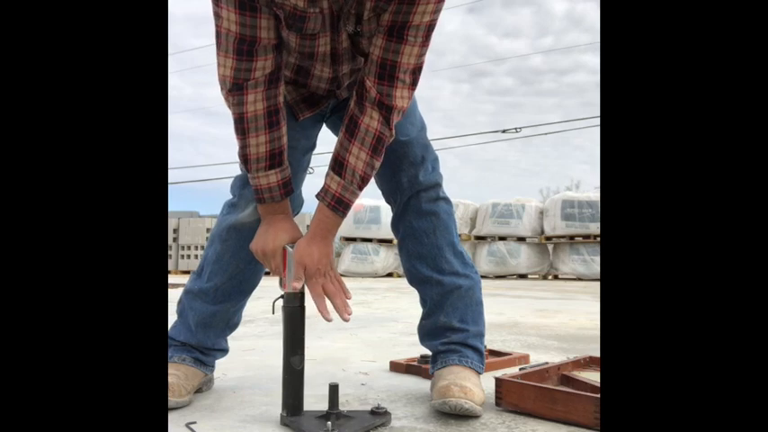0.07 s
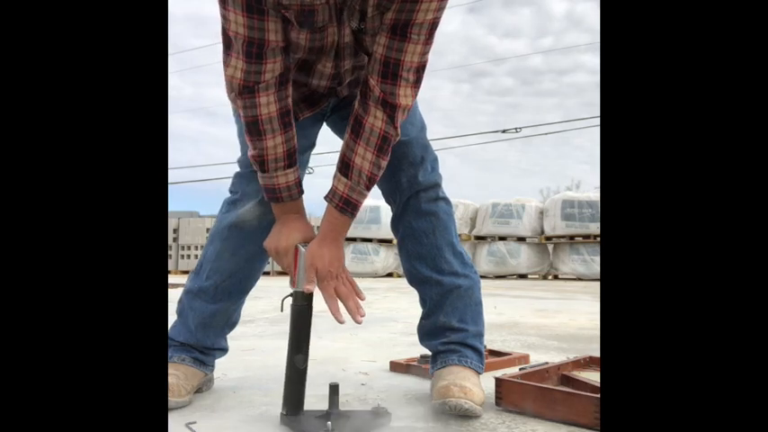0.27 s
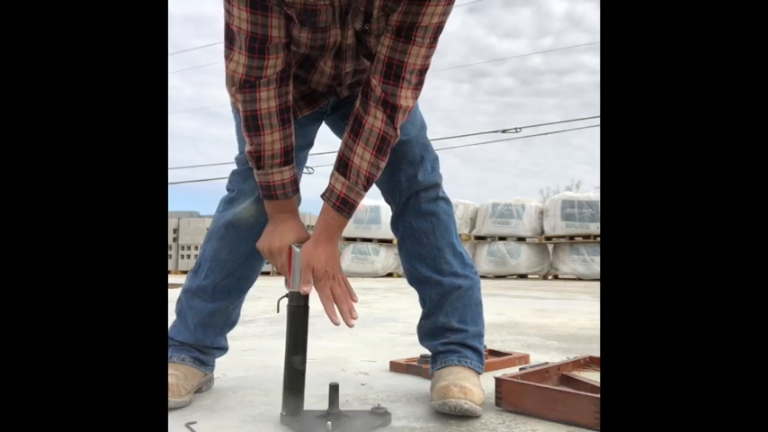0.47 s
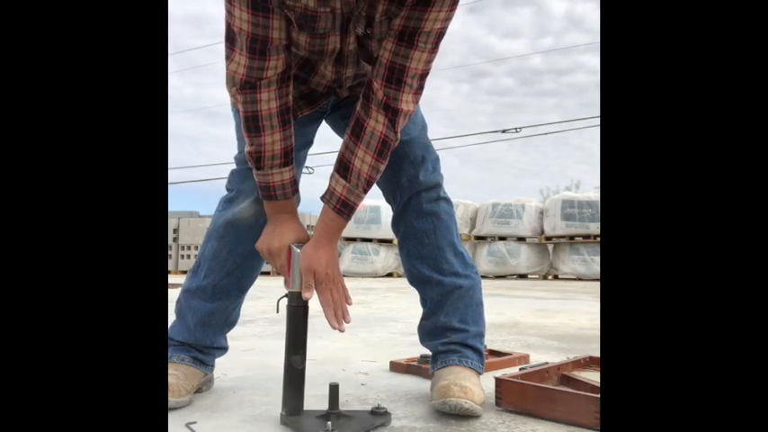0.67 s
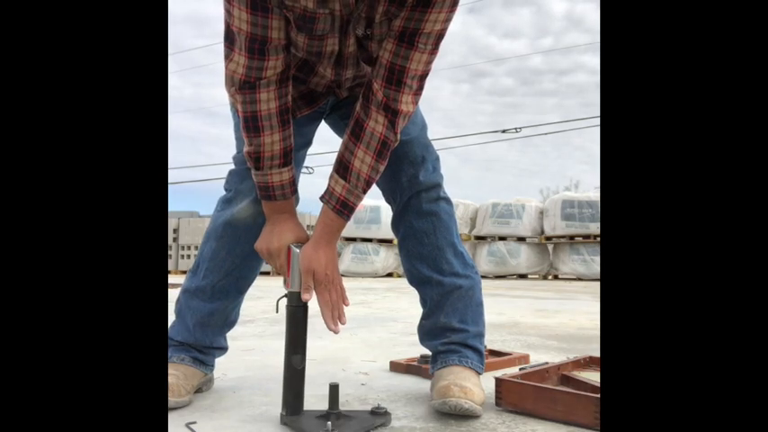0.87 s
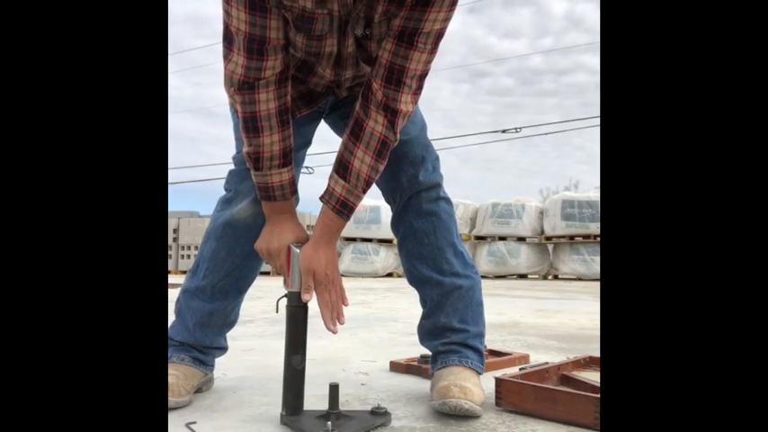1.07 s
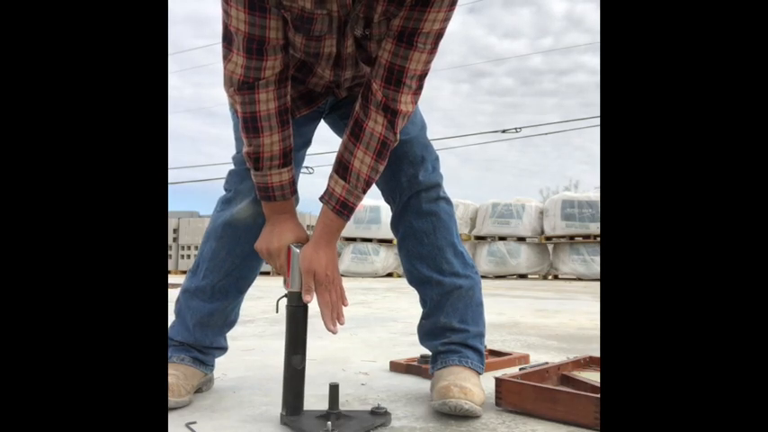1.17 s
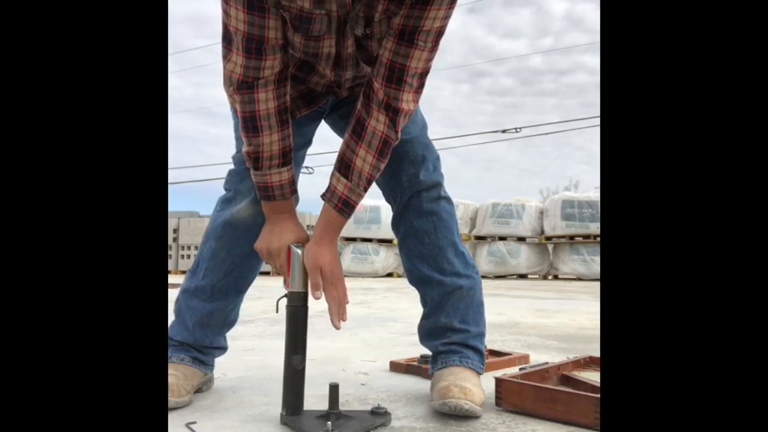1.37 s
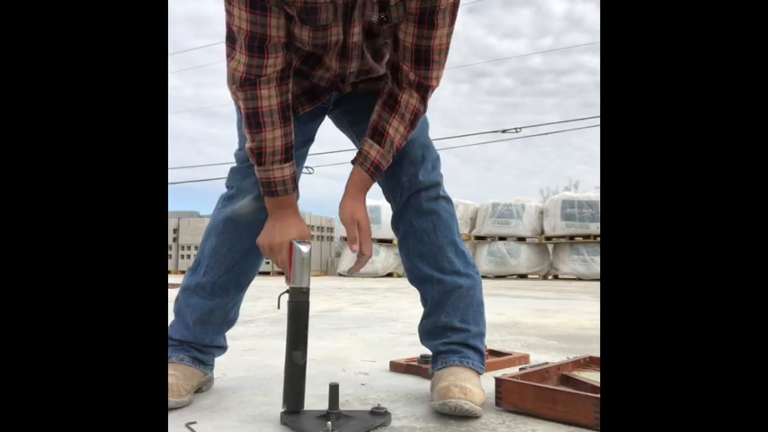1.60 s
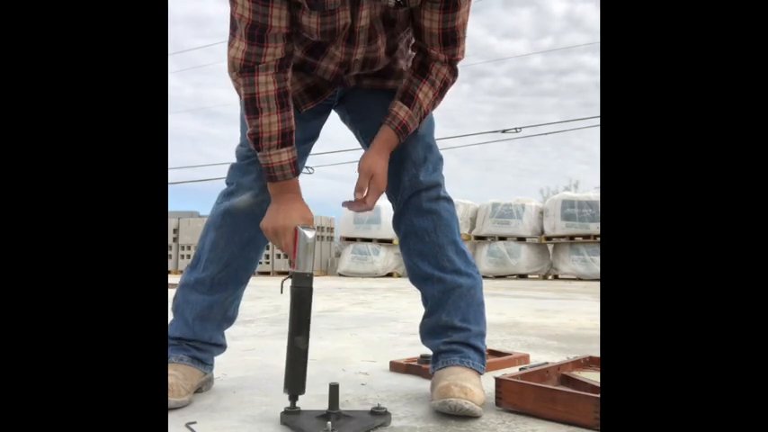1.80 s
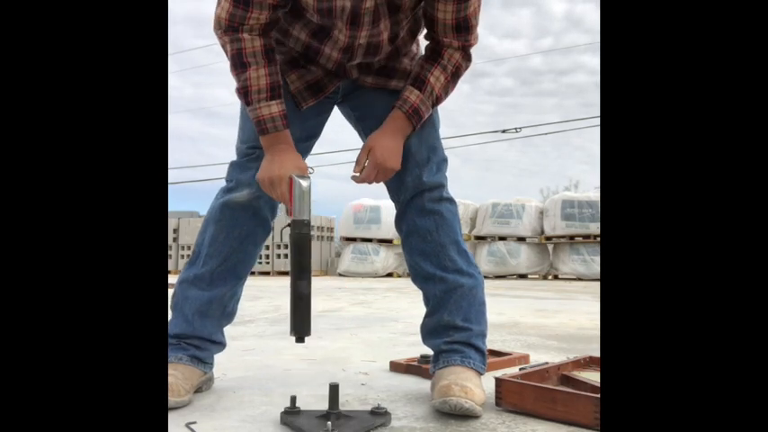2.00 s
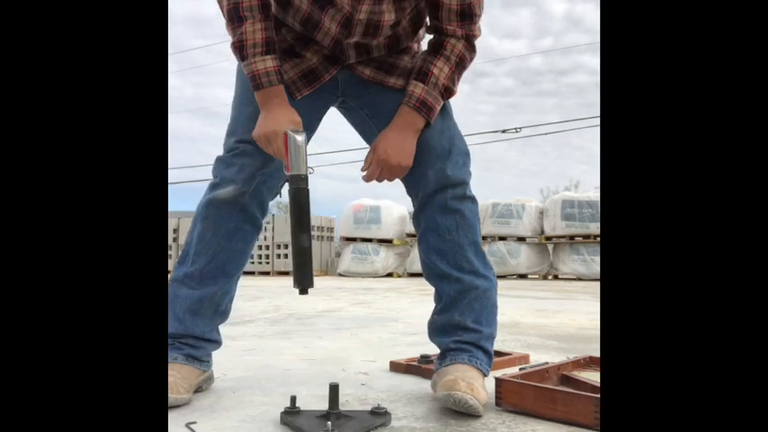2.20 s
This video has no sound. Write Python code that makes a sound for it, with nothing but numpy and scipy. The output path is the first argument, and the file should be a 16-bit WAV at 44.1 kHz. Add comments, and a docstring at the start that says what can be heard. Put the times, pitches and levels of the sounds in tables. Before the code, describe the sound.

A loud sharp bang comes at about 0.25 seconds as a powder-fired tool shoots into concrete. It knocks on its metal plate right after, with a brief steel ring and a short outdoor echo. A small tick follows at 0.5 seconds, then very faint scraping. Near 1.9 seconds the barrel gives a crisp metal clack and slight rattle. Faint wind and a distant engine hum lie underneath.

```python
"""Powder-driven probe in concrete

A powder-actuated driver is fired into a slab in an open yard. The burning charge excites the barrel's
modes and ends in a crack and a thump; steel rings, gas vents, the tool bounces on its base plate and the
yard reverberates. The muzzle rubs faintly by stick-slip friction, sleeves rustle, and the barrel clacks
against its stop as the tool is lifted. A far engine hums and air buffets the microphone."""
import sys
import numpy as np
from scipy import signal
from scipy.fft import rfft, irfft
from scipy.io import wavfile

SR = 44100
rng = np.random.default_rng(int(sys.argv[2]) if len(sys.argv) > 2 else 0)


def digitize_waveform(pressure):
    """Quantize a signal to 16-bit integers and store it at the path in sys.argv[1].

    Rows of a 2-D input are taken as channels; values are limited to [-1, 1].
    """
    field = np.atleast_2d(pressure).T
    bounded = np.clip(field, -1, 1)
    quanta = np.round(bounded * 32767).astype(np.int16)
    wavfile.write(sys.argv[1], SR, quanta)


N = 99225
T = np.arange(N) / SR

# background level, low just after the shot: (time [s], level [dB])
BACKGROUND_LEVELS = [(0, -48), (.25, -46.5), (.42, -61), (.65, -57), (1.0, -53.5), (1.35, -53),
                     (1.7, -49.5), (2.25, -49.5)]
# tones of the far engine: (frequency [Hz], level relative to the background [dB])
ENGINE_TONES = [(113, -2.5), (1895, -18)]
# swells of moving air and of cloth: (time [s], level [dB], rise [s], T60 [s])
AIR_GUSTS = [(.01, -49.5, 0.12, 0.61), (.17, -44.5, 0.48, 0.33), (.9, -53, 0.16, 0.37),
             (1.48, -38, 0.36, 0.67), (2.039, -45, 0.26, 0.29), (2.139, -37.5, 0.27, 0.11)]
SLEEVE_RUSTLES = [(1.539, -66.5, 0.81, 1.22), (1.691, -71.5, 0.39, 0.39), (2.12, -70.5, 1.5, 1.0)]
# the trigger's click, then knocks of the tool on its plate:
# (time [s], main tone [Hz], ring level [dB], noise level [dB], noise T60 [s])
CLICK_AND_KNOCKS = [(0.2299, 1200, -38, -29.5, 0.035), (0.3061, 985, -19.5, -25, 0.073),
                    (.32, 1267, -12, -13.5, 0.018), (0.324, 1127, -15, -29, 0.026),
                    (0.3553, 1230, -26, -49, 0.068), (0.712, 974, -44, -68, 0.03),
                    (1.821, 1150, -31, -50.5, 0.028), (1.847, 1020, -37.5, -55, 0.039)]
# ticks of the mechanism: (time [s], level [dB], gain of added treble [dB])
MECHANISM_TICKS = [(0.4518, -64, -2), (0.5062, -29, -21), (1.758, -56.5, 7)]
# strokes of the muzzle on the plate: (time [s], duration [s], level [dB])
RUB_STROKES = [(0.61, 0.037, -67.5), (0.684, 0.038, -75), (0.819, 0.023, -71.5), (0.876, 0.018, -72),
               (0.984, 0.02, -66), (1.052, 0.075, -64.5)]
# scuffs on concrete: (time [s], level [dB], T60 [s])
MUZZLE_SCUFFS = [(.645, -59.5, .04), (.657, -52.5, 0.033), (1.717, -50, 0.062)]
# bounces of a small steel part: (time [s], level [dB])
PART_BOUNCES = [(1.8885, -38), (1.899, -47)]

# barrel modes driven by the charge: (frequency [Hz], relative level [dB])
BARREL_MODES = [(243, -24), (330, -29), (467, -28.5), (546, -28), (1095, -21), (1580, -26), (1730, -23),
                (1965, -18), (2285, -26), (2480, -29), (4372, -26), (6800, -35)]
# freely decaying modes: (frequency [Hz], relative level [dB], T60 [s])
CONTACT_UPPER_MODES = [(1754, -12, .022), (2392, -17.5, 0.035), (2860, -15, 0.021), (3676, -25, .13),
                       (5200, -16, 0.016)]
STEEL_MODES = [(840, -34, .25), (3660, -25, .08), (7890, -28, .33), (10750, -47, .15), (11710, -46, .14),
               (13690, -38, .075)]
LATCH_MODES = [(680, 1, .035), (1050, 0, .07), (1250, 6, .05), (2960, 8, .02), (3655, -5, .2),
               (4030, 14, .015), (4560, -5, .05), (5310, 13, .012)]
PART_MODES = [(9000, -7, 0.051), (11080, -2.5, 0.034), (13660, -2, 0.059)]
# resonances driven by rubbing: (frequency [Hz], bandwidth [Hz], relative level [dB])
RUB_RESONANCES = [(2948, 37, -3.5), (3290, 90, -4.5), (4250, 32, -5.5), (5435, 80, 2.5), (6460, 140, -6.5),
                  (7600, 260, 0), (8420, 220, -5.5), (10620, 670, -9.5), (13600, 900, -21)]

# spectra of the noise sources: (frequency [Hz], relative level [dB])
BACKGROUND_SPECTRUM = [(15, -42.5), (25, -17), (108, -2), (384, -11), (800, -11.5), (1790, -23),
                       (2110, -29), (7710, -47), (15500, -55.5)]
GUST_SPECTRUM = [(25, -9.5), (58, -2), (105, 0.5), (250, -9), (500, -20), (1200, -42), (4000, -83)]
GAS_SPECTRUM = [(40, -6), (110, -6), (350, -8.5), (700, -4.5), (1100, -1.5), (1900, 0.5),
                (3400, -22.5), (4400, -15), (6900, -28), (16000, -53.5)]
CONTACT_SPECTRUM = [(450, -18.5), (750, -9.5), (1200, -3.5), (1700, -7), (2700, -15.5), (4500, -12),
                    (7660, -14), (8400, -21.5), (11500, -19.5), (16000, -32.5)]
CRACK_SPECTRUM = [(250, -6), (450, -7), (800, -5.5), (1100, -8.5), (2000, -1), (2800, -13.5), (4200, -5.5),
                  (6300, -7.5), (8500, -16), (12500, -17.5), (15500, -19.5)]
VENT_SPECTRUM = [(220, -11.5), (900, -3), (1500, -10.5), (3300, -15), (7400, -18), (16000, -24.5)]
YARD_SPECTRUM = [(100, -2.5), (340, -13.5), (560, -2.5), (1000, -1.5), (1450, -9.5), (2600, -12),
                 (7000, -22), (9000, -32.5), (15500, -42)]
THUD_SPECTRUM = [(110, -7), (190, 0.5), (300, -7), (520, -4.5), (820, -3), (1200, -22), (4000, -58)]
TICK_SPECTRUM = [(1750, -24), (2250, 6.5), (3900, -1), (4700, -7), (6600, 4.5), (8900, -6), (15500, -5.5)]
SCUFF_SPECTRUM = [(650, -1), (1400, -4), (3400, -13), (5600, -14), (12000, -32.5)]
CLOTH_SPECTRUM = [(1500, 1.5), (3000, -9), (3750, -4), (4100, 7), (4500, -1), (6000, -3), (9000, -16.5),
                  (15500, -33)]
SLIDE_SPECTRUM = [(600, -2), (1050, 10), (1600, -25), (2600, 4), (3200, -5), (5200, -13), (12000, -40)]
CLACK_SPECTRUM = [(380, -44), (680, -5), (1200, -14.5), (2200, -8), (2950, -10.5), (3400, -12.5),
                  (4030, -2), (4600, -3.5), (5310, 2.5), (7000, -15.5), (7700, -8.5), (9000, -19),
                  (14000, -25.5)]
RATTLE_SPECTRUM = [(1100, -1), (1800, -7), (4500, -5), (7000, -9), (8700, -5), (13600, -20), (15000, -30)]

TRIGGER_S, BURN_PEAK_S, CRACK_S, RECOIL_S, CLACK_S = .2266, .2505, .2527, .256, 1.8721


def from_db(db):
    """Amplitude ratio of a level in decibels."""
    return 10 ** (np.asarray(db) / 20)


def rms_one(x):
    """Normalisation to unit mean power."""
    return x / np.sqrt(np.mean(x ** 2) + 1e-20)


def noise(spectrum):
    """Spectral shaping of white noise to unit power, with a roll-off below the first point."""
    hz, db = np.transpose(spectrum)
    bins_hz = np.maximum(np.fft.rfftfreq(N, 1 / SR), 1)
    gain = from_db(np.interp(np.log(bins_hz), np.log(hz), db))
    roll_off = np.minimum(bins_hz / hz[0], 1) ** 2
    return rms_one(irfft(rfft(rng.standard_normal(N)) * gain * roll_off, N))


def drift(rate):
    """Random modulation: linear interpolation through `rate` Gaussian values a second."""
    knots = rng.standard_normal(1000)
    return np.interp(T * rate, np.arange(len(knots)), knots)


def burst(at, rise, t60, hold=0):
    """Exponential growth and decay: up 60 dB in `rise` s until `at`, held, then down 60 dB in `t60` s."""
    before = np.maximum(at - T, 0) / rise
    after = np.maximum(T - at - hold, 0) / t60
    return from_db(-60 * np.minimum(before + after, 10))


def sine(hz):
    """Simple harmonic motion with a random phase."""
    return np.sin(2 * np.pi * (hz * T + rng.random()))


def struck(at, modes):
    """Impulse response from time `at`: a sum of damped modes of alternating sign."""
    age = np.maximum(T[:SR] - at % (1 / SR), 0)
    ring = sum((-1) ** k * from_db(db - 60 * np.minimum(age / t60, 10)) * np.sin(2 * np.pi * hz * age)
               for k, (hz, db, t60) in enumerate(modes))
    return np.concatenate([np.zeros(int(at * SR)), ring, np.zeros(N)])[:N]


def background():
    """Broadband yard noise and a far engine's wavering tones superpose under one envelope."""
    hum = sum(from_db(db + drift(14)) * sine(hz) for hz, db in ENGINE_TONES)
    level_db = np.interp(T, *np.transpose(BACKGROUND_LEVELS))
    return from_db(level_db) * (noise(BACKGROUND_SPECTRUM) + hum)


def gusts():
    """Turbulent air at the microphone produces low-frequency pressure fluctuations."""
    envelope = sum(from_db(db) * burst(at, rise, t60) for at, db, rise, t60 in AIR_GUSTS)
    return envelope * noise(GUST_SPECTRUM)


def burning_charge():
    """Forced vibration: rushing gas swells with the barrel's modes, of which the low ones last longer."""
    swell = burst(BURN_PEAK_S, rise=.035, t60=.027)
    low_swell = from_db(-3) * burst(BURN_PEAK_S, rise=.042, t60=.027, hold=.009)
    modes = sum(from_db(db) * sine(hz) * (low_swell if hz < 700 else swell) for hz, db in BARREL_MODES)
    steady_rms = np.sqrt(sum(from_db(db) ** 2 for _, db in BARREL_MODES) / 2)
    barrel = from_db(-5) * modes / steady_rms
    gas = from_db(-10.5) * noise(GAS_SPECTRUM) * swell
    onset = burst(TRIGGER_S, rise=.008, t60=1, hold=1)
    return (barrel + gas) * onset


def click_and_knocks():
    """Impulsive excitation of modes: the trigger clicks, then the tool knocks on its plate."""
    crunch = noise(CONTACT_SPECTRUM)
    contacts = np.zeros(N)
    for at, hz, ring_db, noise_db, noise_t60 in CLICK_AND_KNOCKS:
        main_mode, lower_mode = (hz, 0, .037), (.8 * hz, -7.5, .04)
        contacts += from_db(ring_db) * struck(at, [main_mode, lower_mode] + CONTACT_UPPER_MODES)
        contacts += from_db(noise_db) * crunch * burst(at, rise=.0023, t60=noise_t60)
    return contacts


def steel_ring():
    """Free vibration: after the shot each steel mode wavers in level and decays at its own rate."""
    gain_db, waver_db = -1, 2
    ring = sum(from_db(db + waver_db * drift(100)) * sine(hz) * burst(.288, rise=.22, t60=t60)
               for hz, db, t60 in STEEL_MODES)
    onset = burst(.241, rise=.013, t60=1, hold=1)
    return from_db(gain_db) * ring * onset


def probe_crack():
    """The probe's impact on the concrete is brief, so its spectrum is broad."""
    return from_db(-4.5) * noise(CRACK_SPECTRUM) * burst(CRACK_S, rise=.0011, t60=.017, hold=.003)


def venting_gas():
    """Jet noise: gas hisses out as the tool recoils."""
    return from_db(-28.5) * noise(VENT_SPECTRUM) * burst(.2912, rise=.084, t60=.21) * (T > CRACK_S)


def yard_reverberation():
    """The shot's diffuse reflections merge into exponentially decaying noise."""
    return from_db(-38.5) * noise(YARD_SPECTRUM) * burst(.33, rise=.11, t60=.57) * (T > CRACK_S)


def recoil_thump():
    """Recoil radiates a low pressure swing whose frequency falls exponentially."""
    start_hz, end_hz, sag_s = 403, 55, .0045
    age = np.maximum(T - RECOIL_S, 0)
    hz = end_hz + (start_hz - end_hz) * np.exp(-age / sag_s)
    phase = 2 * np.pi * np.cumsum(hz * (age > 0)) / SR
    return from_db(-19) * np.sin(phase) * burst(RECOIL_S, rise=.002, t60=.053, hold=.019)


def landing_thud():
    """A heavily damped impact: the tool's weight lands on the slab."""
    return from_db(-26) * noise(THUD_SPECTRUM) * burst(.3075, rise=.0096, t60=.05, hold=.0038)


def mechanism_ticks():
    """Small steel parts settle; their short contacts radiate bright transients."""
    snap = noise(TICK_SPECTRUM)
    high_pass = signal.butter(2, 11000, "high", fs=SR, output="sos")
    treble = signal.sosfilt(high_pass, noise(TICK_SPECTRUM))
    return sum(from_db(db) * burst(at, rise=.0017, t60=.015) * (snap + from_db(treble_db) * treble)
               for at, db, treble_db in MECHANISM_TICKS)


def muzzle_rub():
    """Stick-slip friction: noise pulsing at a nearly even rate hisses and drives steel resonances."""
    slip_hz, jitter, depth_db, grain_db = 114.5, .045, 8.5, 3
    cycles = np.cumsum(slip_hz * (1 + jitter * drift(slip_hz))) / SR
    friction_db = depth_db * np.cos(2 * np.pi * cycles) + grain_db * drift(slip_hz)
    friction = from_db(friction_db) * rng.standard_normal(N)
    body = np.zeros(N)
    for k, (hz, width, db) in enumerate(RUB_RESONANCES):
        resonance = signal.lfilter(*signal.iirpeak(hz, hz / width, fs=SR), friction)
        body += (-1) ** k * from_db(db) * rms_one(resonance)
    hiss = signal.sosfilt(signal.butter(1, [3500, 13000], "band", fs=SR, output="sos"), friction)
    strokes = sum(from_db(db) * burst(at, rise=.053, t60=.12, hold=duration)
                  for at, duration, db in RUB_STROKES)
    return (rms_one(body) + from_db(-7) * rms_one(hiss)) * strokes


def muzzle_scuffs():
    """Sliding friction on gritty concrete gives short, dull bursts of noise."""
    envelope = sum(from_db(db) * burst(at, rise=.048, t60=t60) for at, db, t60 in MUZZLE_SCUFFS)
    return envelope * noise(SCUFF_SPECTRUM)


def sleeve_rustle():
    """Friction of cloth on cloth gives fluctuating noise as the arm lifts."""
    envelope = sum(from_db(db) * burst(at, rise, t60) for at, db, rise, t60 in SLEEVE_RUSTLES)
    flutter = from_db(1.35 * drift(120))
    return envelope * flutter * noise(CLOTH_SPECTRUM)


def barrel_clack():
    """Friction, then impact: the barrel slides to its stop, rings the latch and rattles; a part pings."""
    slide = from_db(-39) * noise(SLIDE_SPECTRUM) * burst(CLACK_S, rise=.094, t60=.012)
    snap = from_db(-12.5) * noise(CLACK_SPECTRUM) * burst(CLACK_S, rise=.00095, t60=.012)
    latch = from_db(-40.5) * struck(CLACK_S, LATCH_MODES)
    rattle_db = -47.5 + 5.5 * drift(300)
    rattle = from_db(rattle_db) * noise(RATTLE_SPECTRUM) * burst(1.89, rise=.045, t60=.11)
    pings = sum(from_db(db) * struck(at, PART_MODES) for at, db in PART_BOUNCES)
    return slide + snap + latch + rattle + pings


def scene():
    """Superposition: the pressures of all sources add at one microphone."""
    outdoors = background() + gusts()
    shot = burning_charge() + click_and_knocks() + steel_ring() + probe_crack()
    aftermath = venting_gas() + yard_reverberation() + recoil_thump() + landing_thud()
    handling = mechanism_ticks() + muzzle_rub() + muzzle_scuffs() + sleeve_rustle() + barrel_clack()
    return (outdoors + shot + aftermath + handling)[None]


def record(dry):
    """Soft saturation rounds the peaks, and a steep low-pass filter limits the bandwidth."""
    ceiling, cutoff_hz = .96, 16000
    low_pass = signal.ellip(12, .1, 100, cutoff_hz, fs=SR, output="sos")
    return signal.sosfilt(low_pass, ceiling * np.tanh(dry / ceiling))


dry = scene()
out = record(dry)
digitize_waveform(out)
```